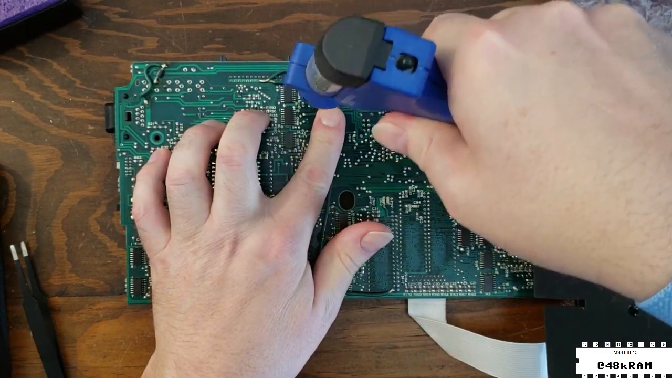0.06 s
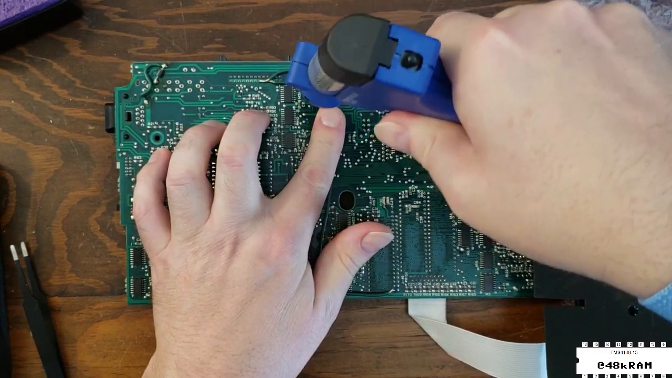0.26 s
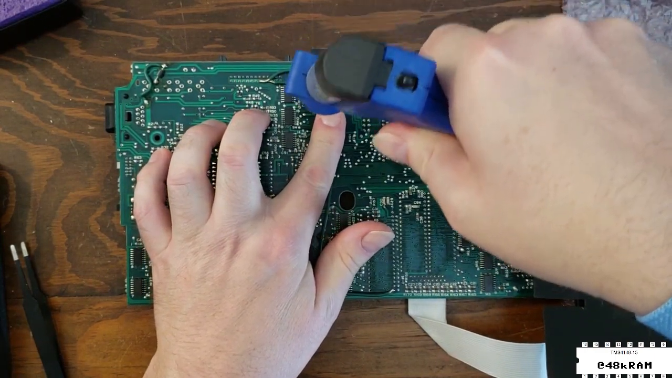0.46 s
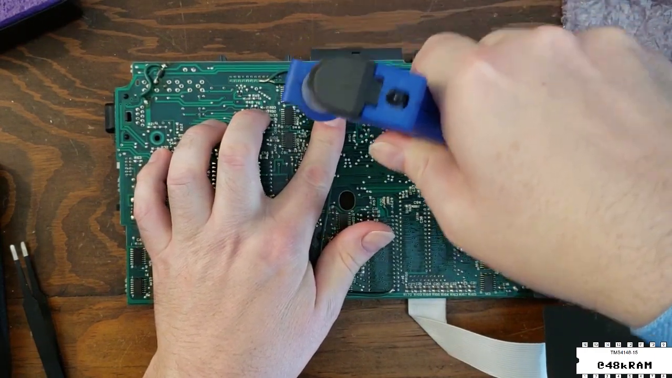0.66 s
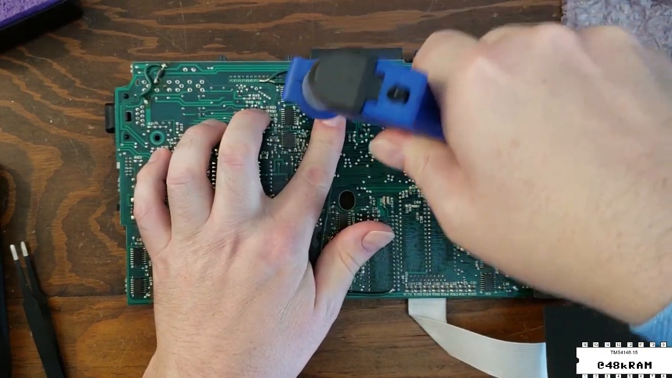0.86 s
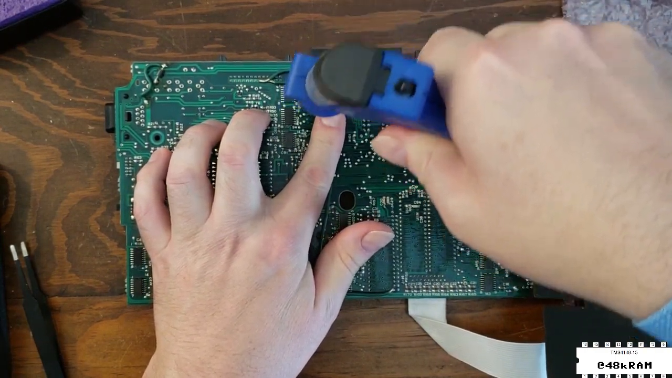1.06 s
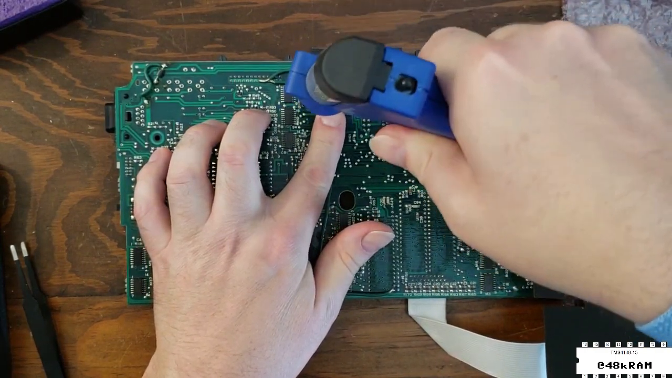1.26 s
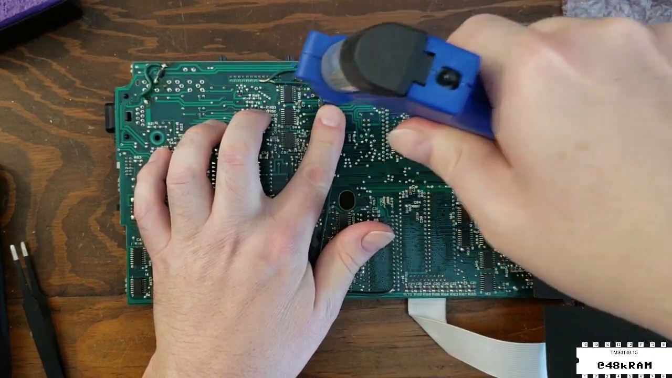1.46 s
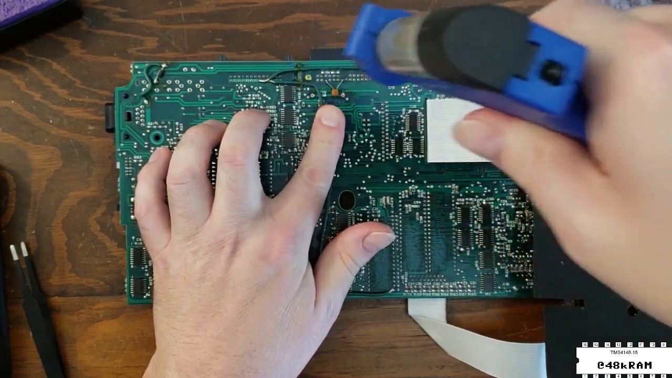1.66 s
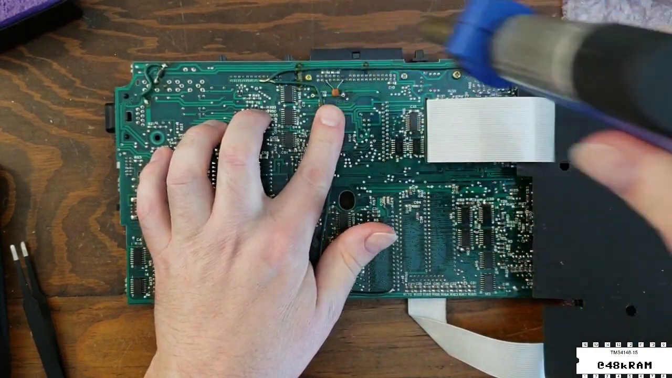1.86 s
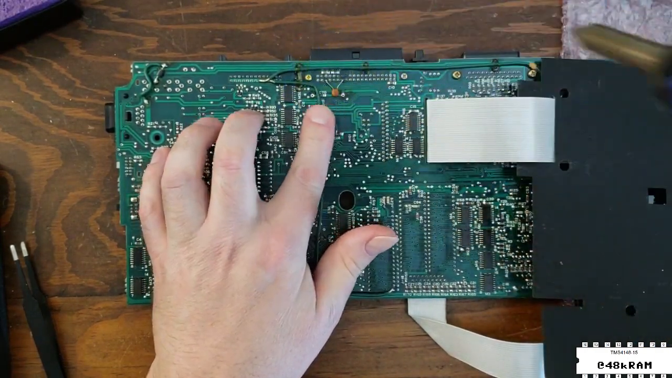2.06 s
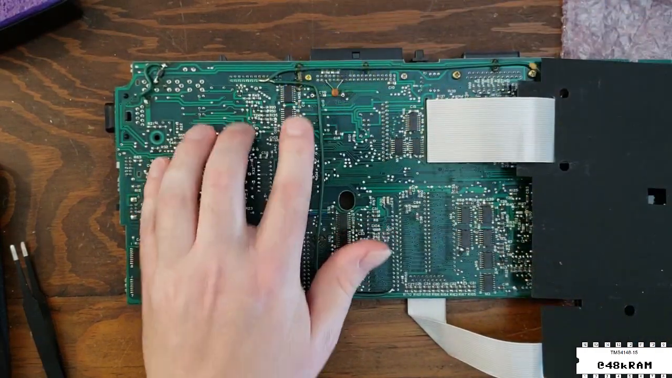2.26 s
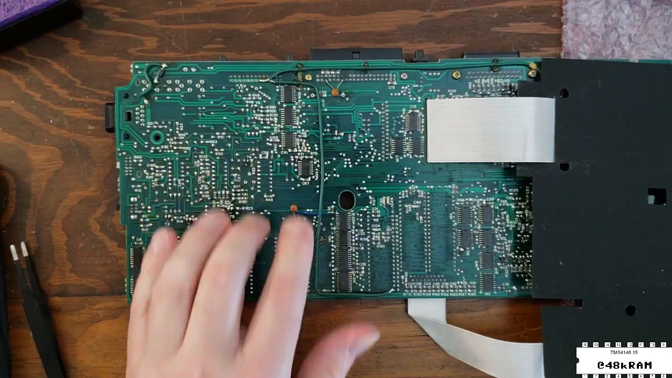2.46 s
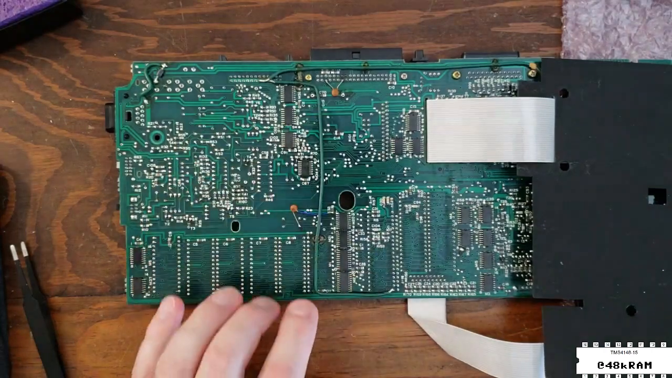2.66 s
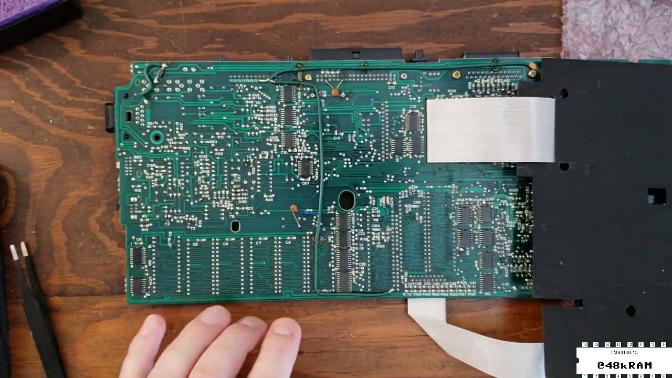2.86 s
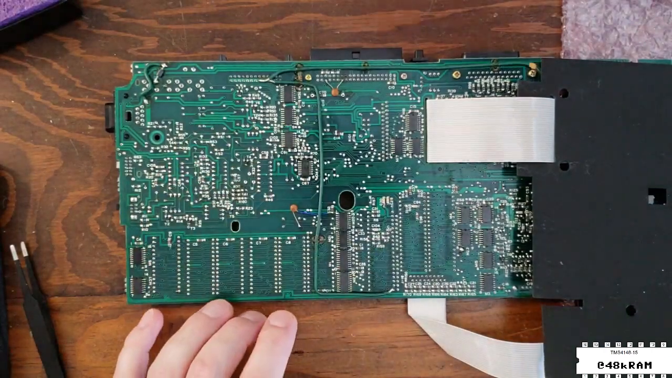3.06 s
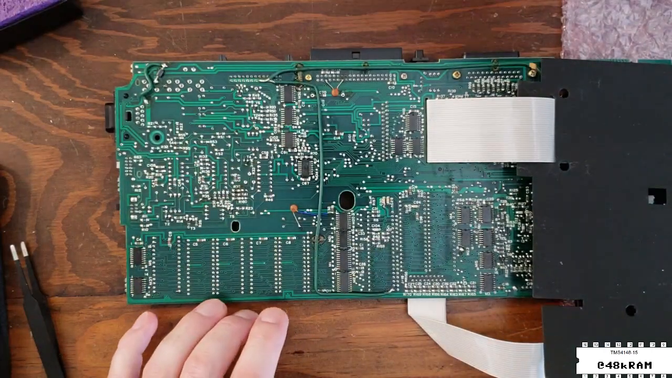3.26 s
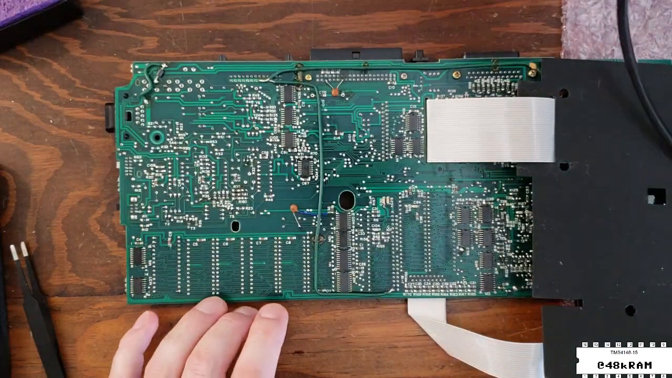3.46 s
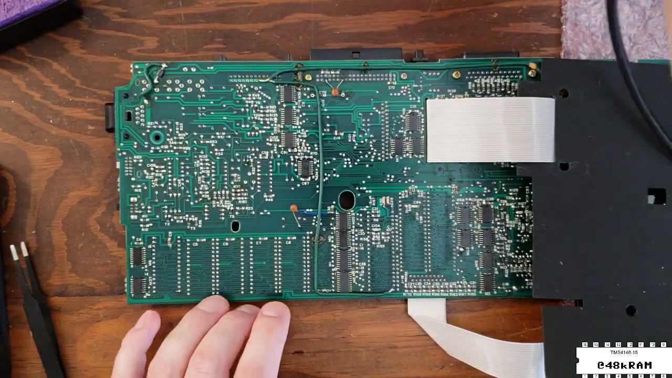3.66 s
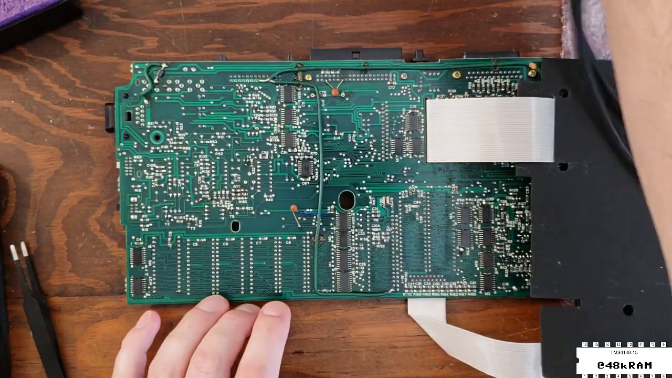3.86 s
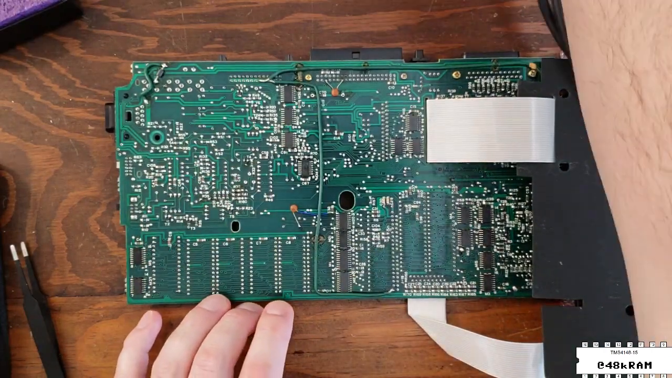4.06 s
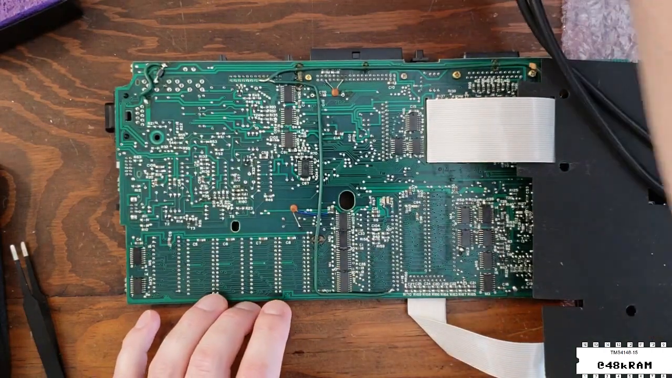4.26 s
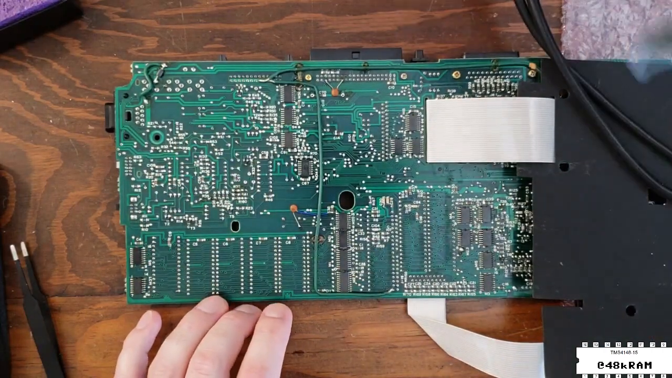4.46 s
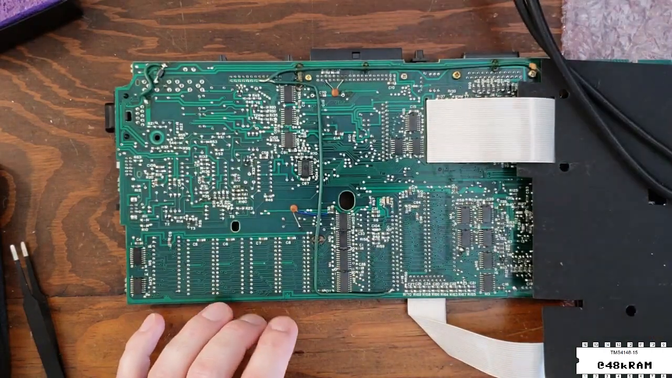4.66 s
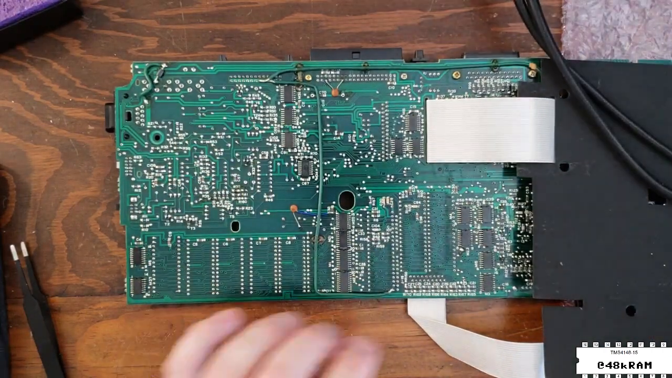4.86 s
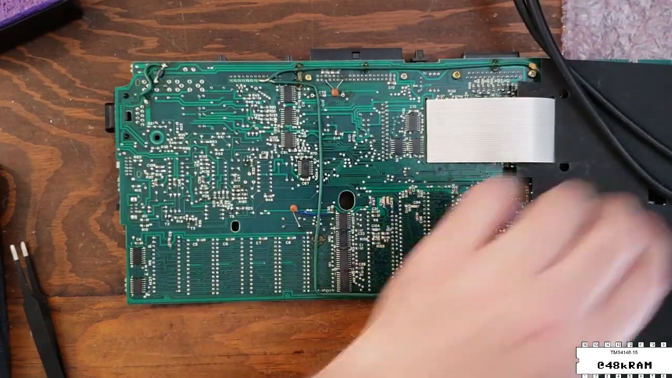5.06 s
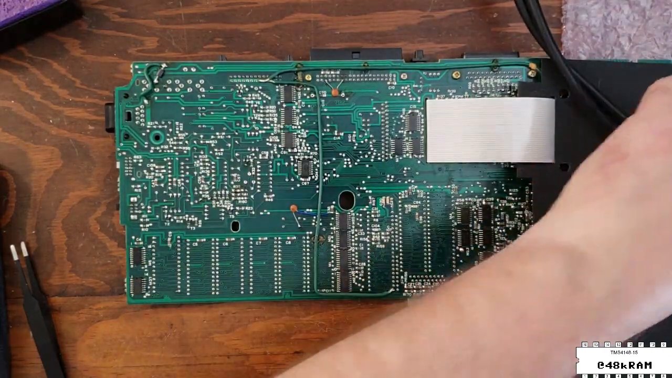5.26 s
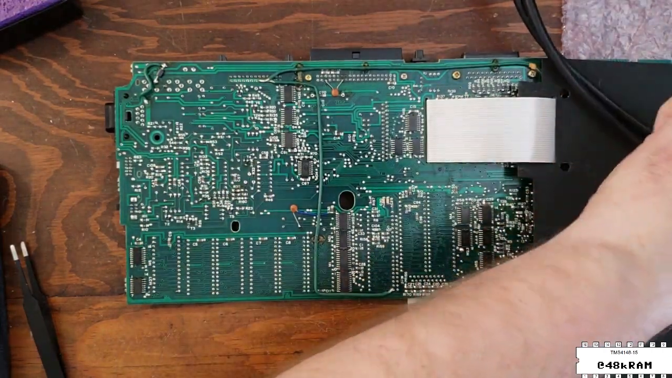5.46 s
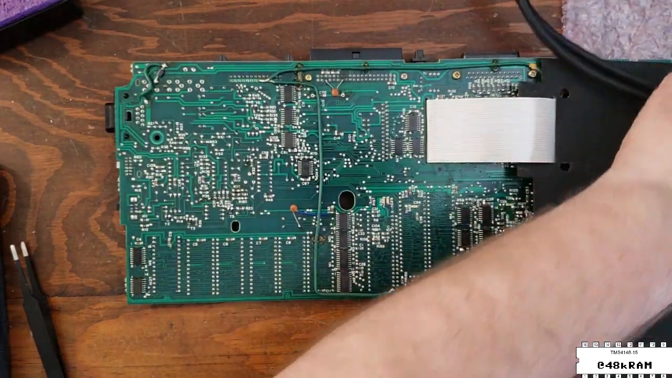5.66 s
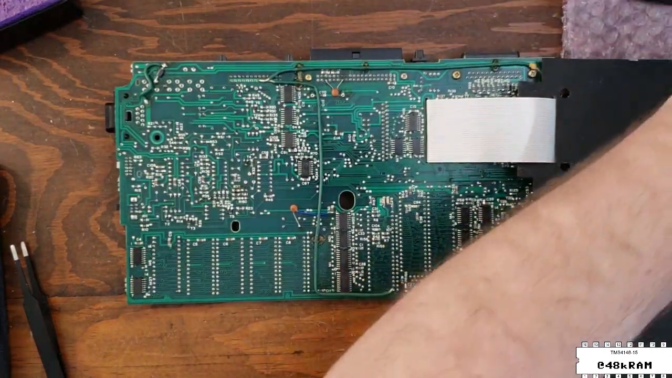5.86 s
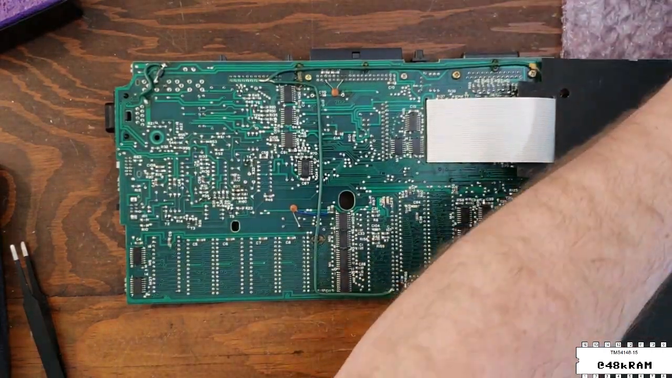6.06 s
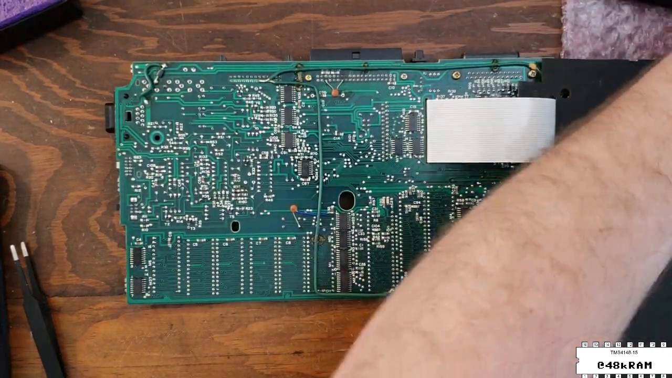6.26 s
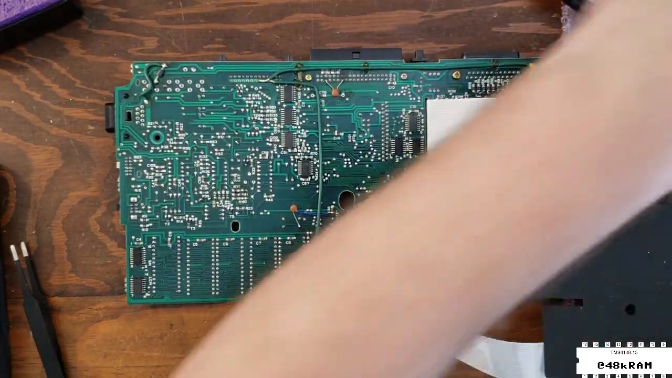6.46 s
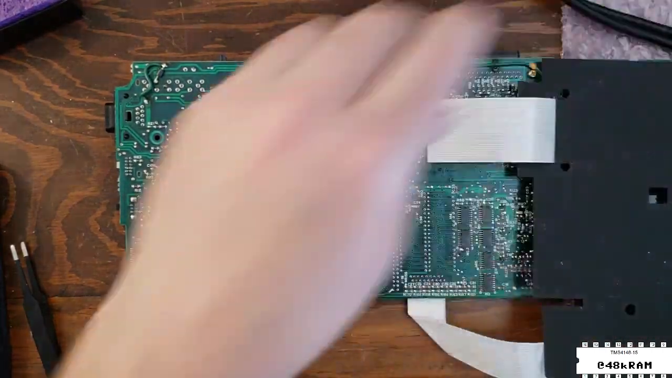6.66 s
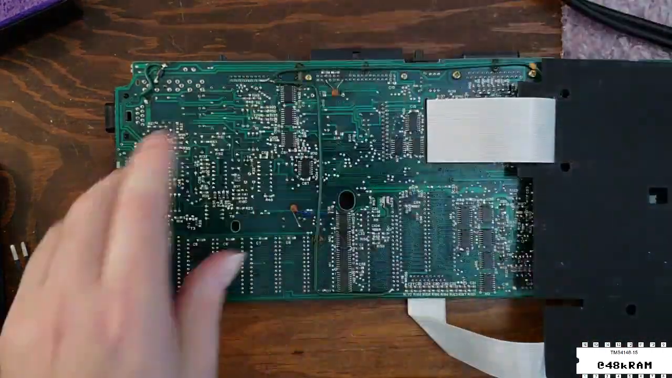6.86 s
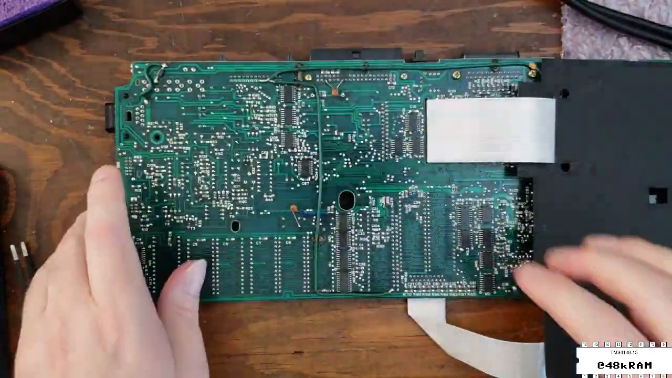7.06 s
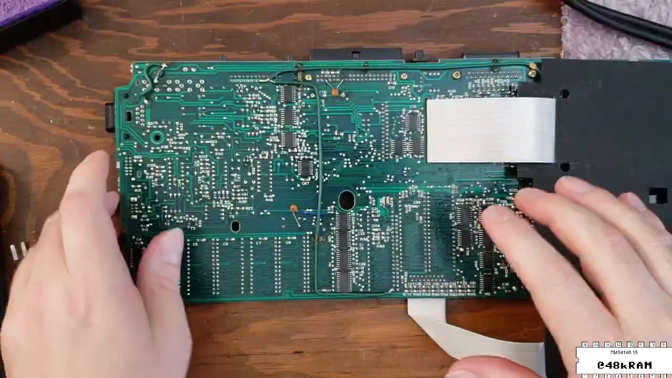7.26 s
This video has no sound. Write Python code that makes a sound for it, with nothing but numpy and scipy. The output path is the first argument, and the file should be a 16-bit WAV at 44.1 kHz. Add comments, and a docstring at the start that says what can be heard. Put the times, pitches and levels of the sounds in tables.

```python
"""Desoldering gun and its stand

A desoldering gun's diaphragm pump spins up, hums and coasts down near two microphones: a sum of shaft
orders, with noise puffed once a turn. The gun is then pushed, scraping and knocking, into its metal stand,
where noise and impulses excite decaying modes. Hands brush cables and bench as gritty noise, with a few dry
snaps. A quiet room sounds underneath as coloured noise with faint whistles."""
import sys
import numpy as np
from scipy import signal
from scipy.fft import rfft, irfft
from scipy.io import wavfile

SR = 44100
rng = np.random.default_rng(int(sys.argv[2]) if len(sys.argv) > 2 else 0)


def waveform_to_disk(signal):
    """Save audio, clipped to [-1, 1], as 16-bit WAV at the path in sys.argv[1]."""
    frames = np.transpose(np.atleast_2d(signal))
    scaled = np.clip(frames, -1, 1) * 32767
    samples = np.round(scaled).astype(np.int16)
    wavfile.write(sys.argv[1], SR, samples)


def how_loud(loudness_db):
    """Turn decibels into a plain amplitude multiplier (0 dB gives 1, 20 dB gives 10)."""
    steps = np.asarray(loudness_db, float) / 20
    return 10 ** steps


N = 322371
TIME = np.arange(N) / SR

# Modes of the bench. Each row: frequency in Hz, relative level in dB, decay time t60 in seconds.
BENCH_MODES = [(42.5, -15, 0.16), (75.5, -12.5, 0.1), (139, -11, 0.086), (219, -6.5, 0.068),
               (251, -5, 0.034), (339, 1, 0.03), (476, 4.5, 0.016), (660, -0.5, 0.013)]
# Modes of stand and tool. Each row: frequency in Hz, relative level in dB, free decay time t60 in seconds.
HARD_MODES = [(820, 1, .05), (920, 3, .06), (1060, -1, .035), (1450, -7, .015), (2080, -6, .05),
              (2400, -7, .04), (3400, -10, .04), (4300, -13, .015), (6170, -20, .12), (7300, -14, .025)]
# Level difference of the microphone pair. Each row: frequency in Hz, left over right in dB.
PAIR_LEAN = [(60, 0), (180, 2), (550, 3.5), (1650, 5.5), (4970, 7.5), (15000, 2)]


def evened(x):
    """Normalisation: scales a signal to rms 1."""
    return x / np.sqrt(np.mean(x ** 2) + 1e-20)


def read(points, hz):
    """Interpolates a spectrum linearly on a log-frequency axis."""
    f, value = np.transpose(points)
    return np.interp(np.log(hz + 1), np.log(f + 1), value)


def band(x, low_hz, high_hz):
    """Butterworth band-pass filtering."""
    return signal.sosfilt(signal.butter(2, [low_hz, high_hz], "band", fs=SR, output="sos"), x)


def noise_band(low_hz, high_hz):
    """Band-limited random fluctuation of rms 1."""
    return evened(band(rng.standard_normal(N), low_hz, high_hz))


def resonate(x, hz, width):
    """Simple resonance of peak gain 1: shifts its centre to 0 Hz, smooths, and shifts back."""
    turn, r = np.exp(2j * np.pi * hz * TIME), np.exp(-np.pi * width / SR)
    return 2 * (turn * signal.lfilter([1 - r], [1, -r], x / turn)).real


def coloured(x, points, low_hz, high_hz):
    """Spectral shaping and interchannel coherence: gives two noises the pair's likeness and lean."""
    # Each row: frequency in Hz, left-right likeness (1 is identical).
    likeness = [(60, 0.78), (300, 0.99), (640, .5), (1400, 0.093), (3100, 0), (15000, 0.15)]
    hz = np.fft.rfftfreq(N, 1 / SR)
    a, b = rfft(x)
    same = np.clip(read(likeness, hz), -1, 1)
    lean = how_loud(read(PAIR_LEAN, hz) / 2)
    right = same * a + np.sqrt(1 - same ** 2) * b
    z = how_loud(read(points, hz)) * np.array([a * lean, right / lean])
    # the mean of the channels has rms 1 within the given band
    inside = (hz > low_hz) * (hz < high_hz)
    return irfft(z, N) / np.sqrt(np.mean(irfft(z.mean(0) * inside, N) ** 2))


def grit(per_s, spread_db, smooth):
    """Stick-slip excitation: sparse clicks of uneven size over smooth noise."""
    size = how_loud(spread_db * np.minimum(rng.exponential(1, N), 4))
    clicks = size * (rng.random(N) < per_s / SR)
    return evened(clicks * rng.standard_normal((2, N))) + smooth * rng.standard_normal((2, N))


def room(x):
    """Reverberation: sparse taps of random sign, each frequency decaying at its own rate."""
    # Each row: frequency in Hz, decay time t60 in seconds.
    walls = [(100, 0.4), (500, 0.21), (2000, 0.076), (8000, 0.16)]
    taps = rng.choice([-1., 1.], (2, SR // 2)) * (rng.random((2, SR // 2)) < .05)
    taps[:, :150] = 0  # the first echo comes after the direct sound
    hz, t, z = signal.stft(taps, SR, nperseg=256)
    decay = how_loud(-60 * t / read(walls, hz)[:, None])
    tail = signal.istft(z * decay, SR, nperseg=256)[1]
    return signal.oaconvolve(x, tail / np.linalg.norm(tail[0]), axes=1)[:, :N]


def swells(rows, rise, fall, linger_db, linger_fall):
    """Exponential envelopes: each stroke rises, holds, lets go and lingers (slopes in dB per second)."""
    parts = 0
    for s, length, db, *parts_db in rows:
        early, late = np.maximum(s - TIME, 0), np.maximum(TIME - s - length, 0)
        release = how_loud(-fall * late) + how_loud(linger_db - linger_fall * late)
        shape = how_loud(db - rise * early) * release
        parts = parts + how_loud([0] + parts_db)[:, None] * shape
    return parts


def room_tone():
    """Broadband background: distant fans and air as fluctuating coloured noise, with resonant whistles."""
    # Each row: frequency in Hz, spectral density in relative dB.
    tone_colour = [(18, -29.5), (30, -36), (54, -3), (75, -17), (283, -17.5), (411, -5.5), (532, -10.5),
                   (1050, -17.5), (2930, -40), (3970, -35), (4460, -40.5), (8000, -36.5), (10400, -90),
                   (17600, -120)]
    # Each row: time in seconds, level in dB (rms of the air from 300 to 1500 Hz).
    tone_level = [(0, -44), (2.5, -63), (3.5, -58.5), (4.6, -56), (5.4, -56), (7.31, -54.5)]
    # Faint fuzzy whistles. Each row: frequency in Hz, width of one resonator in Hz, dB over the room level.
    whistles = [(3850, 8, -24), (13900, 60, -33)]
    db = np.interp(TIME, *np.transpose(tone_level))
    lumps = how_loud(1.1 * noise_band(1.5, 12))
    whine = sum(how_loud(d) * evened(resonate(rng.standard_normal((2, N)), f, w)) for f, w, d in whistles)
    air = coloured(rng.standard_normal((2, N)), tone_colour, 300, 1500)
    return how_loud(db) * (lumps * air + whine)


def brush():
    """Sliding friction: skin and cable give a patchy hiss, a hollow resonance near 950 Hz and a low push."""
    # Hands on cables and bench. Each row: start in seconds, length in seconds, level in dB,
    # dull part in dB over it, treble part in dB over it.
    rubs = [(2.025, 0.018, -70.5, 8, -16), (3.23, 0.065, -73.5, 9, -11), (5.0, 0.4, -84, 12, 8.5),
            (5.465, 0.0063, -58, 13, -14), (5.515, 0.015, -52.5, 2.5, -2), (5.72, 0.01, -47, 4, -1.5),
            (5.87, 0.064, -59.5, -8, 0), (6.06, 0.015, -72.5, 12, 10.5), (6.2, 0.034, -46, -6, -10),
            (6.3, 0.021, -60.5, -26, 3), (6.345, 0.02, -45, -9, -0.5), (6.42, 0.14, -53, -6, 2.5),
            (6.94, 0.039, -47.5, 2, -7), (7.14, 0.015, -64, -3, -17), (7.195, 0.033, -56, 6.5, -10.5)]
    # Each row: frequency in Hz, spectral density in relative dB.
    hiss_colour = [(1000, -20), (2000, 3.5), (3000, 6.5), (4000, 4.5), (5300, 1.5), (7000, 2.5),
                   (16000, -1.5)]
    press, dull_press, bright_press = swells(rubs, rise=600, fall=340, linger_db=-10.5, linger_fall=70)
    catch = how_loud(3.5 * noise_band(12, 150))  # skin catches and lets go
    drive = catch * grit(per_s=2500, spread_db=2.2, smooth=1.4)
    hollow = resonate(resonate(drive, 946, 380), 946, 380)
    dull = evened(0.84 * hollow + 0.25 * band(drive, 390, 2730))
    dull = dull + 0.038 * evened(band(drive[0], 73, 980))  # low push, alike in both channels
    hiss = coloured(drive, hiss_colour, 1600, 11000)
    middle, bright = band(hiss, 840, 5620), band(hiss, 3360, 11500)
    return press * middle + bright_press * bright + dull_press * dull


def ring_modes(drive, modes):
    """Modal superposition: one drive excites a bank of damped resonances."""
    # a simple resonance of half-power width 2.2 / t60 decays by 60 dB in t60
    return evened(sum(how_loud(d) * resonate(drive, f, 2.2 / t60) * np.sqrt(t60) for f, d, t60 in modes))


def scrape():
    """Stick-slip friction: gritty slips ring the metal stand, and heavier strokes shake the bench."""
    # Each row: start in seconds, length in seconds, level in dB, bench part in dB over it.
    strokes = [(3.805, 0.045, -34, -8.5), (3.95, 0.039, -29.5, -13), (4.052, 0.038, -31.5, -7),
               (4.125, 0.04, -49, 18), (4.175, 0.034, -31.5, -0.5)]
    # Each row: frequency in Hz, spectral density in relative dB.
    scrape_colour = [(300, -5.5), (700, -9), (1300, -28), (3500, -5), (5000, -14), (7600, -9.5),
                     (9500, -14), (16000, -33)]
    press, weight = swells(strokes, rise=3900, fall=248, linger_db=-17, linger_fall=89)
    drive = grit(per_s=2000, spread_db=3, smooth=.9)
    hard, low = ring_modes(drive[0], HARD_MODES), ring_modes(drive[0], BENCH_MODES)
    low = evened(low + .5 * evened(band(drive[1], 50, 450)))
    rasp = coloured(drive, scrape_colour, 600, 8000)
    return press * (0.2 * rasp + 0.8 * band(hard, 400, 8500)) + weight * low


def knocks():
    """Impact excitation: each blow strikes, then rattles, ringing the hard parts and thumping the bench."""
    # Each row: start in seconds, relative hard ring in dB, relative thump in dB, relative treble in dB,
    # time in seconds at which the rattle is cut off, centre of the treble ring in Hz.
    blows = [(0.026, -16.5, -37.5, -37, 0.028, 1820), (1.483, -50, -55, -33, .004, 12900),
             (1.499, -26, -34.5, -31, 0.078, 1376), (2.014, -51, -57.5, -51.5, 0.012, 2900),
             (2.155, -64, -72, -61, 0.01, 3600), (3.147, -62, -70, -60, 0.026, 5040),
             (3.226, -47, -68, -58.5, 0.03, 2580), (3.597, -27.5, -48.5, -44, 0.11, 1720),
             (3.718, -43.5, -62, -62, 0.034, 1500), (3.806, -32, -38, -35, 0.043, 2340),
             (3.834, -21, -35, -26.5, 0.018, 2420), (3.947, -16, -37, -32, 0.15, 7050),
             (3.966, -34, -55, -26, 0.011, 2050), (4.05, -14, -59, -30, 0.01, 5530),
             (4.123, -23, -40, -30.5, 0.033, 7000), (4.148, -18, -38, -27, 0.01, 4120),
             (4.223, -7, -25, -23.5, 0.0097, 3460), (4.234, -18, -25.5, -62, 0.03, 2000),
             (4.334, -43, -60, -56, 0.013, 6000), (5.438, -25.5, -64, -68, 0.03, 1200),
             (5.464, -37, -49, -58, 0.02, 2500), (5.506, -24.5, -46.5, -53, 0.02, 3000),
             (5.735, -30, -44.5, -61, 0.03, 2000), (5.861, -64, -56, -44.5, 0.017, 2960),
             (5.943, -39.5, -45, -64, 0.014, 700), (6.097, -47, -44, -60, 0.025, 800),
             (6.189, -24.5, -34.5, -30.5, 0.015, 3580), (6.215, -51, -45, -33.5, 0.013, 4600),
             (6.383, -32.5, -33.5, -51, 0.014, 810), (6.432, -51, -49.5, -39.5, 0.01, 2320),
             (6.488, -53, -47, -45, 0.0046, 4000)]
    t, out = np.arange(SR // 4) / SR, np.zeros((2, N + SR))
    modes = HARD_MODES + BENCH_MODES
    for s, db, thump_db, treble_db, rattle_s, ring_hz in blows:
        luck, noise = rng.uniform(-1, 1, (len(modes), 2)), rng.standard_normal((2, len(t)))
        noise[1] = .55 * noise[0] + .83 * noise[1]
        # blows softer than -55 dB meet a hand-held, damped part and ring shorter
        free = np.clip(1 + 0.1 * (db + 55), 0.12, 1)
        rings = []
        for k, ((f, d, t60), (u, v)) in enumerate(zip(modes, luck)):
            decay_s = t60 * (free if k < len(HARD_MODES) else 1)
            envelope = how_loud(d + 4 * u - 60 * t / decay_s)
            rings.append((-1) ** k * envelope * np.sin(2 * np.pi * f * (1 + v / 60) * t))
        hard_ring, bench_ring = sum(rings[:len(HARD_MODES)]), sum(rings[len(HARD_MODES):])

        # a noise burst, then an uneven chatter that ends at rattle_s
        chatter = np.interp(t, t[::150], how_loud(4 * noise[0, ::150]))
        held = np.exp(-t / .09) / (1 + (t / rattle_s) ** 10)
        rattle = noise * (2.6 * np.exp(-t / 0.0048) + 0.51 * chatter * held)
        struck = rattle + 45 * (t == 0)

        hard = signal.fftconvolve(struck, band(hard_ring, 300, 8940)[None], axes=1)[:, :len(t)]
        low = signal.fftconvolve(rattle[0] + 40 * (t == 0), bench_ring)[:len(t)]
        broad = band(band(rattle, 500, np.clip(2 * ring_hz, 3500, 9000)), 300, 11000)
        narrow = band(rattle, ring_hz * 0.925, ring_hz * 1.043)
        blow = how_loud(db) * (hard + 0.17 * hard[::-1]) / abs(hard).max() / 2
        blow += how_loud(thump_db + 9.5) * low / abs(low).max()
        blow += how_loud(treble_db) * (0.7 * broad + 1.7 * narrow)
        out[:, round(s * SR):][:, :len(t)] += blow * how_loud([[1.7], [-1.7]])  # leans left
    return out[:, :N]


def snaps():
    """Transient and recoil: a dry pressure spike followed by a slow push back."""
    # Each row: start in seconds, peak in dB, left over right in dB, push back from 0 to 1.
    ticks = [(2.448, -37.5, 3, 0.25), (3.11, -45, -16, 0.1), (4.74, -42, -8, 0.15), (6.012, -60, -8, 0.3),
             (6.0255, -23.5, -14, 0.37)]
    t, out = np.arange(SR // 4) / SR, np.zeros((2, N + SR))
    for s, db, pan_db, push in ticks:
        snap = np.exp(-t / .0001) - push * np.sin(2 * np.pi * 110 * t) * np.exp(-t / .005)
        out[:, round(s * SR):][:, :len(t)] += snap * how_loud([[db + pan_db / 2], [db - pan_db / 2]])
    return out[:, :N]


FULL_HZ, RELEASE_S = 88.17, 1.49  # full shaft speed; the moment the trigger is let go


def shaft_speed(after):
    """Exponential relaxation: the shaft races up, creeps as it warms to its load, and slumps on release."""
    creep_hz, creep_s, race_hz, race_s = 3.0, .38, 38.13, .062  # shortfalls in Hz, time constants in s
    coast_share, slump_s = 0.7, 0.0592  # share of the speed left after release, time constant in s
    hz = FULL_HZ - creep_hz * np.exp(-TIME / creep_s) - race_hz * np.exp(-TIME / race_s)
    return hz * (coast_share + (1 - coast_share) * np.exp(-after / slump_s))


def shaft_orders(hz, angle, slack, air_db):
    """Harmonic synthesis: integer multiples of the shaft angle, weighted by the response of gun and bench."""
    # Push of shaft orders 1 to 5, in dB.
    order_push = [0.5, -2, -12.5, -17.5, -27]
    # How gun and bench answer the low orders. Each row: frequency in Hz, response in dB.
    body_response = [(50, -16), (88, -41), (110, -21), (140, -12.5), (160, -16), (180, -26.5), (230, -15.5),
                     (245, -26), (257, -16), (265, -8.5), (312, -13), (330, -12), (338, -4), (345, 1),
                     (353, -2.5), (385, -7.5), (425, -5.5), (434, -10), (440, -18)]
    # Upper orders at full speed. Each row: shaft order, dB over the air and rattle setting.
    upper_orders = [(6, -5.5), (7, -12), (8, -23), (9, -3), (10, -17.5), (11, -9), (12, -25), (13, -15.5),
                    (14, -16.5), (15, -2), (16, -27.5), (17, -2), (20, -2), (22, -7), (23, -13.5),
                    (26, -9.5), (27, -9), (28, -24), (30, -13.5), (32, -12), (35, -17), (36, -9.5),
                    (37, -8.5), (59, -10), (70, -13)]
    port_lead_s = 0.00011  # left ahead of right
    out, side, running = np.zeros((2, N)), np.array([[1], [-1]]), slice(0, 2 * SR)
    levels = [(k, db + read(body_response, k * hz)) for k, db in enumerate(order_push, 1)]
    # below full speed the strokes are uneven, so the upper orders dissolve into rattle
    levels += [(round(k), db + air_db - 650 * slack) for k, db in upper_orders]
    for k, order_db in levels:
        lean = how_loud(side * read(PAIR_LEAN, k * hz.max()) / 2)
        # the stroke is smeared in time and reaches one port a little earlier
        phase = -1.15 * k ** 2 + side * np.pi * k * FULL_HZ * port_lead_s
        line = np.cos(k * angle[running] + phase)
        out[:, running] -= np.sqrt(2) * how_loud(order_db[running]) * lean * line
    return out


def air_and_rattle(angle, slack):
    """Amplitude-modulated flow noise: turbulence puffs once a turn and excites the shell's resonances."""
    # Each row: frequency in Hz, spectral density in relative dB.
    air_colour = [(40, -21), (80, 1), (150, 2), (400, 1), (620, -0.5), (900, 7), (2300, 5), (3000, -1.5),
                  (4000, -1), (4800, -7), (8000, -4.5), (16000, -18)]
    # Air rings in the shell. Each row: frequency in Hz, width of one resonator in Hz, dB at full speed.
    housing = [(774, 25, -5.5), (906, 45, -15), (340, 125, -8), (1500, 810, -25.5)]
    depth = np.minimum(.28 + 2.5 * slack, .8)  # slow strokes come as separate bursts
    puff = 1 + depth * np.cos(angle) + 0.066 * np.cos(2 * angle + 1)
    flutter = how_loud(0.5 * noise_band(3.0, 27))
    drive = puff * flutter * grit(per_s=2500, spread_db=4.0, smooth=0.78)
    air = coloured(drive, air_colour, 670, 8800)
    jet = evened(how_loud(23 * np.cos(angle - 0.6) + 2 * noise_band(3.4, 60)))  # the valve spits once a turn
    spit = coloured(jet * rng.standard_normal((2, N)), air_colour, 710, 5800)
    air = air + how_loud(-2.5) * band(spit, 5500, 13000)
    breath, shell = rng.standard_normal(N), 0
    for f, w, db in housing:
        # off full speed the loose strokes make the broad resonances boom
        boom = 1 + (w - 60) / 8 * np.minimum(slack, .15)
        shell = shell + how_loud(db) * boom * evened(resonate(resonate(breath, f, w), f, w))
    return air + shell * (1 + depth * np.cos(angle))


def pump():
    """Rotating-machine noise: tonal shaft orders plus modulated air and rattle, then a bench shudder."""
    # Bench shudder as the motor runs out. Each row: time in seconds, level in dB rms.
    coast = [(1.49, -40), (1.53, -33.5), (1.7, -55), (2.05, -55), (2.15, -69), (2.3, -84)]
    after = np.maximum(TIME - RELEASE_S, 0)
    hz = shaft_speed(after)
    slack = 1 - hz / hz.max()
    wander = 1 + 0.000067 * noise_band(0.33, 2.9)
    angle = 2 * np.pi * np.cumsum(hz * wander) / SR
    # air and rattle settle as the vacuum builds
    air_db = -36.5 + 8.5 * np.exp(-TIME / 0.35)

    # the hum fades from release and stumbles when slow; the air blows on 38 ms longer
    start = np.minimum(TIME / 0.048, 1) ** 2
    stumble_db = 28 * slack * (noise_band(5.6, 31) - 1) * (after > 0)
    on = start * how_loud(stumble_db - 229 * after)
    blowing = start * how_loud(-234 * np.maximum(after - 0.038, 0))

    hum = on * shaft_orders(hz, angle, slack, air_db)
    rattle = blowing * how_loud(air_db) * air_and_rattle(angle, slack)
    coast_s, coast_db = np.transpose(coast)
    coasting = (TIME >= coast_s[0]) * (TIME <= coast_s[-1])
    shudder = how_loud(np.interp(TIME, coast_s, coast_db)) * coasting * noise_band(32.7, 90.6)
    return hum + rattle + how_loud(2.0) * room(rattle) + shudder


def scene():
    """Superposition: near sources with their echoes, the pump, and the room tone."""
    near = scrape() + brush() + knocks() + snaps()
    # hands and stand lie to one side: left 0.13 ms after right
    near[0] = np.roll(near[0], round(0.00013 * SR))
    return near + how_loud(-4.5) * room(near) + pump() + room_tone()


def top_cut(x):
    """Nothing passes above the cut-off."""
    return signal.sosfilt(signal.butter(12, 17030, fs=SR, output="sos"), x)


def record(dry):
    """Linear filtering: white hiss joins the scene, and the microphone response colours both."""
    # Each row: frequency in Hz, response in dB (a peak near 7 kHz, a dip near 9 kHz).
    microphone = [(20, -37), (60, -2), (5500, -2.5), (7000, 0), (7700, -6), (8700, -14.5), (10500, -3.5),
                  (12500, 5), (15700, 10.5), (16100, -43)]
    hissy = dry + how_loud(-75.5) * rng.standard_normal(dry.shape)
    response = how_loud(read(microphone, np.fft.rfftfreq(N, 1 / SR)))
    heard = irfft(rfft(hissy) * response, N)
    return top_cut(heard)


dry = scene()
out = record(dry)
waveform_to_disk(out)
```